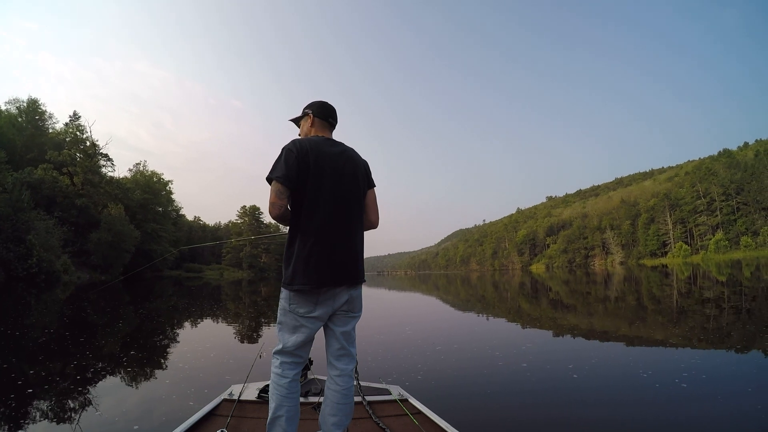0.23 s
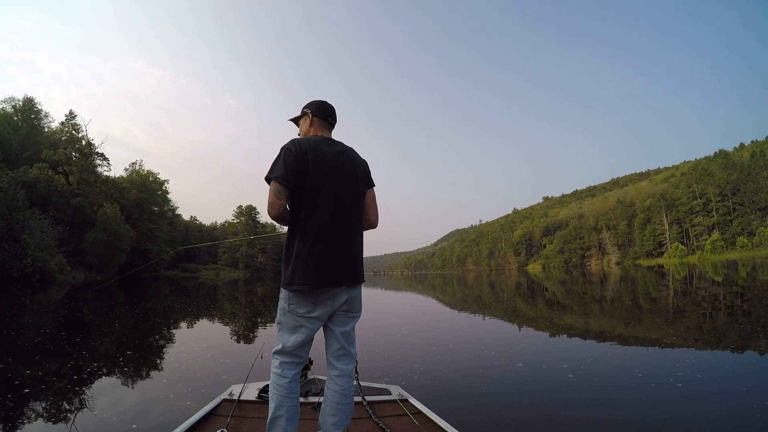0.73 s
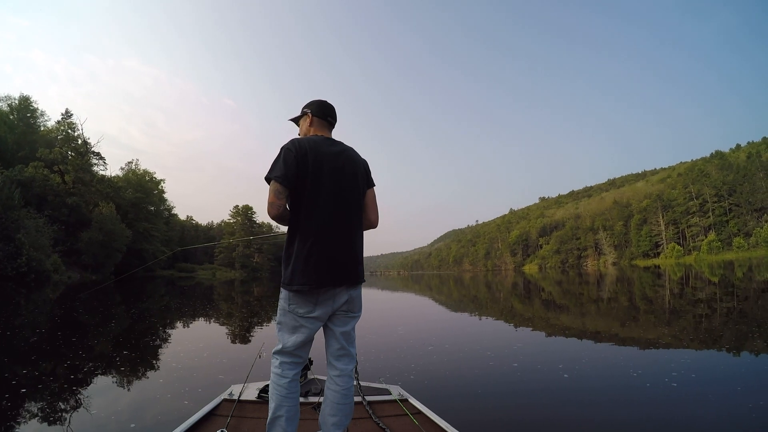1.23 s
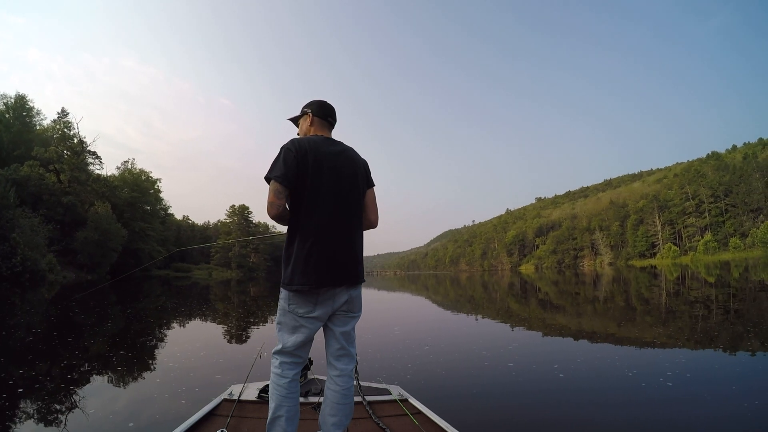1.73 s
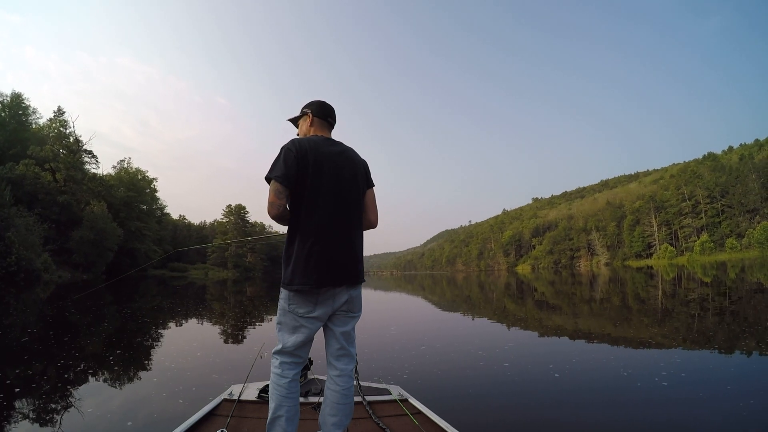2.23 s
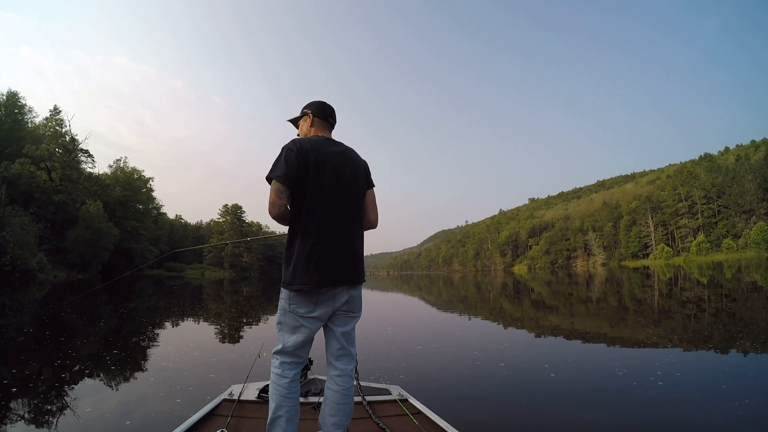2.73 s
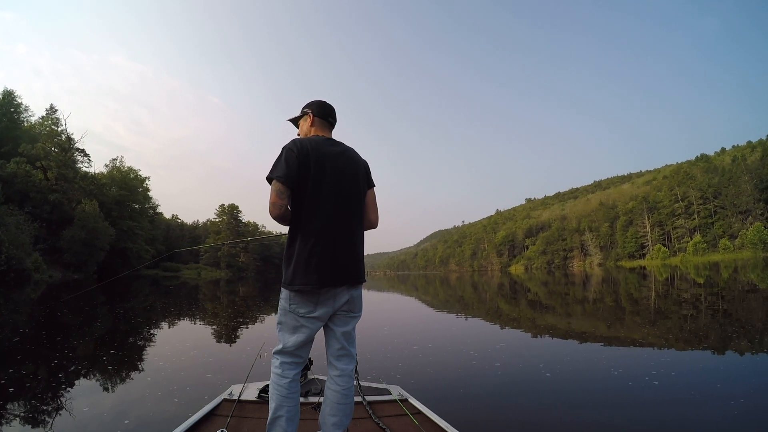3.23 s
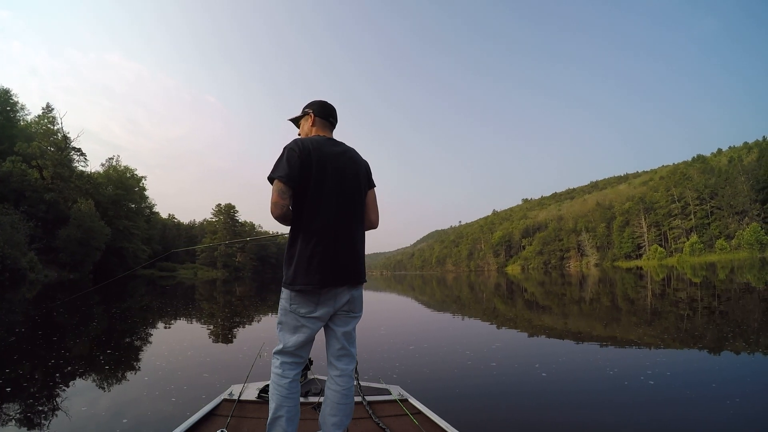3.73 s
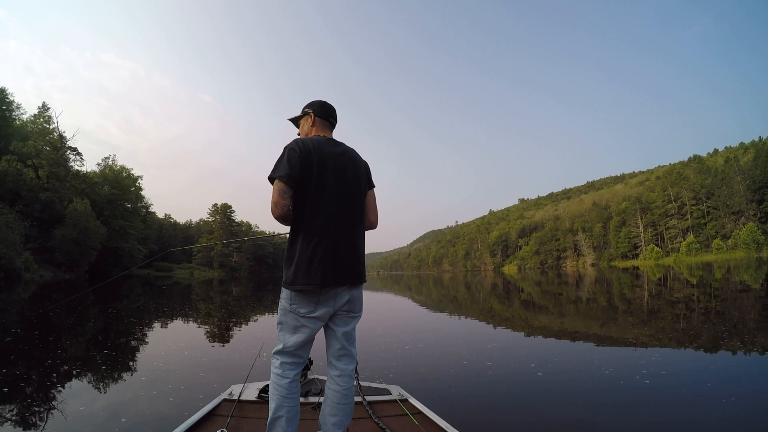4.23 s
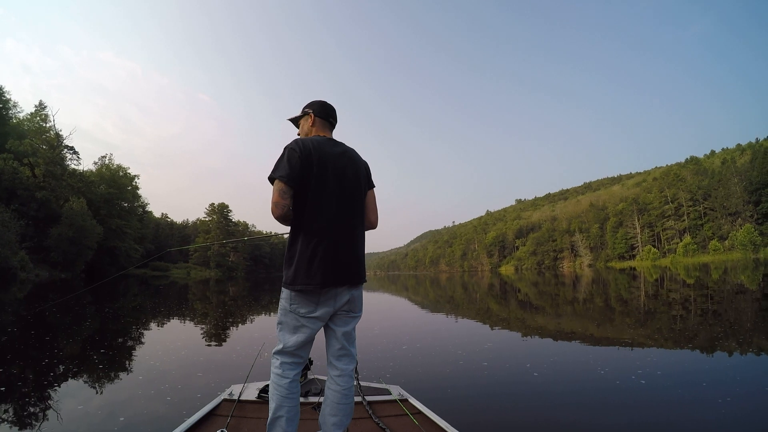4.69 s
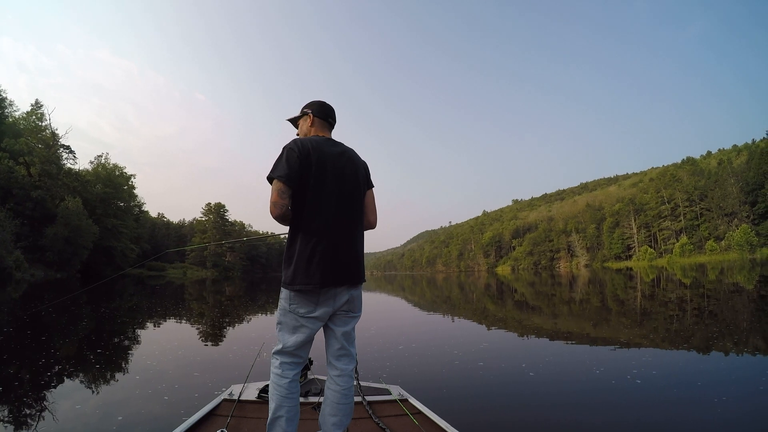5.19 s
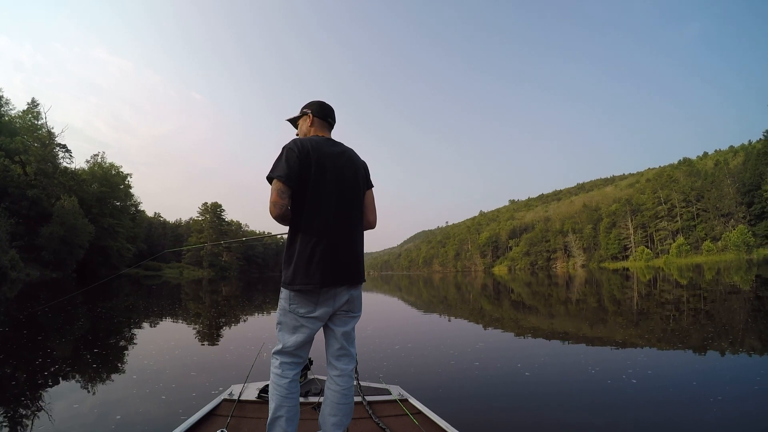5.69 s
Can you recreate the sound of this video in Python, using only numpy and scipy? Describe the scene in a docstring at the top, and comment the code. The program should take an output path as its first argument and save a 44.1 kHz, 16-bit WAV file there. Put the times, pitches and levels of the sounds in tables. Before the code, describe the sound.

From a small boat on a lake, water washes softly and fades as a fishing reel whirs on and off for the first few seconds. Line hisses close on the left, the hull bumps, and one sharp knock stands out midway. Birds whistle and chirp from the banks throughout, one crying out nearby. To the right, a depth sounder keeps up rapid, even ticking beside a faint, fading cricket.

```python
"""Birds chirp from the wooded banks of a lake at dawn, heard from a small boat; one near bird cries out.
Their calls are gliding whistles, some hoarse, that echo off the shore. A depth sounder ticks fast
and evenly, a fishing reel's gears whir in bursts, and its line hisses over the rod rings on the left.
Gear knocks on the rod, the hull bumps, and a faint cricket sings on the right. Underneath, a wash of
water and a broad hiss slowly die down. Left and right are two microphone ports in one housing."""
import sys
import numpy as np
from scipy import signal
from scipy.fft import rfft, irfft, next_fast_len
from scipy.io import wavfile
from scipy.ndimage import uniform_filter1d

SR = 44100
rng = np.random.default_rng(int(sys.argv[2]) if len(sys.argv) > 2 else 0)


def transcribe(signal):
    """Save signal, clipped to [-1, 1], as a 16-bit WAV file at the path in sys.argv[1]."""
    frames = np.atleast_2d(signal).T
    limited = np.clip(frames, -1, 1)
    pcm = np.round(limited * 32767).astype(np.int16)
    wavfile.write(sys.argv[1], SR, pcm)


N = 262395
T = np.arange(N) / SR
SIZE = next_fast_len(N)
HZ = np.maximum(np.arange(SIZE // 2 + 1) * SR / SIZE, 1)

# Clear slurred notes. Each row: start and length in seconds, first, loudest and last pitch in Hz,
# share of the length before the peak, peak level in dB, pan in dB (plus is left), left lag in ms.
CLEAR_NOTES = [ (0.197, 0.019, 3260, 3030, 2750, 0.71, -36.5, -3, -0.035),
               (0.171, 0.056, 4800, 4850, 5100, 0.35, -44.5, -12, -0.059),
               (0.232, 0.058, 2315, 2900, 3650, 0.8, -34, -2.5, -0.029),
               (0.293, 0.044, 3650, 4780, 3950, 0.64, -31, -2.5, -0.035),
               (0.358, 0.03, 3740, 3520, 3310, 0.3, -33.5, -2, 0.00095),
               (0.375, 0.035, 3390, 3120, 2460, 0.51, -34.5, 0, 0.011),
               (0.471, 0.036, 2660, 3300, 3100, 0.41, -37, 1, -0.011),
               (0.755, 0.044, 3470, 3450, 3820, 0.3, -49, -10, -0.028),
               (0.827, 0.039, 3100, 3300, 3060, 0.68, -41.5, -19, -0.03),
               (0.928, 0.075, 4340, 4300, 4150, 0.23, -55, -4, -0.022),
               (1.688, 0.045, 3620, 4470, 3600, 0.51, -30.5, -4.5, -0.023),
               (1.733, 0.052, 2640, 2486, 2420, 0.46, -45, -1, -0.03),
               (1.821, 0.067, 2610, 2780, 2670, 0.73, -39.5, -5.5, -0.023),
               (2.065, 0.014, 6000, 5970, 5950, 0.46, -42, -16, 0.04),
               (3.072, 0.043, 2670, 2710, 3380, 0.57, -48.5, -2, 0.014),
               (3.106, 0.027, 4050, 3870, 3360, 0.61, -41.5, -4, 0.0079),
               (3.129, 0.018, 3480, 3050, 2900, 0.64, -38, -3, 0.021),
               (3.142, 0.029, 2970, 2800, 2500, 0.35, -40.5, -7, 0.021),
               (3.178, 0.024, 2570, 2940, 3420, 0.32, -38.5, 2, -0.04),
               (3.194, 0.03, 3450, 2930, 2260, 0.51, -33.5, 2, -0.071),
               (3.32, 0.024, 5170, 4920, 5030, 0.4, -45, -16, -0.074),
               (3.769, 0.025, 3260, 3110, 3190, 0.59, -48, -10, 0.01),
               (3.898, 0.055, 5200, 5500, 5470, 0.34, -57, -11, 0.019),
               (4.054, 0.14, 6350, 6740, 6900, 0.58, -61, -8, 0.024),
               (4.231, 0.066, 4520, 4690, 4610, 0.13, -44, -14, -0.0085),
               (4.38, 0.066, 2910, 2996, 2860, 0.33, -53, -13, -0.01),
               (4.431, 0.088, 3050, 2820, 2700, 0.51, -62, -15, -0.01),
               (4.653, 0.028, 3450, 4150, 4650, 0.65, -35.5, -5, -0.027),
               (4.696, 0.036, 5300, 5570, 5350, 0.4, -53, -16, -0.091),
               (4.727, 0.026, 4850, 4150, 3400, 0.5, -30, -4.5, -0.027),
               (4.752, 0.04, 3330, 2900, 2200, 0.26, -45.5, -1, -0.039),
               (4.792, 0.017, 2450, 2900, 3320, 0.5, -49, 6, 0.032),
               (4.809, 0.029, 3280, 2970, 3100, 0.6, -37, 5, 0.025),
               (4.831, 0.045, 3350, 4160, 4000, 0.69, -45.5, -5, -0.0078),
               (4.96, 0.073, 3800, 3270, 2650, 0.47, -52.5, -20, -0.02),
               (5.701, 0.01, 3600, 3380, 3280, 0.58, -26, -5, -0.033), ]
# Rough chips. Each row reads like a clear note.
ROUGH_CHIPS = [ (0.311, 0.047, 5490, 5280, 5000, 0.22, -29, -13, -0.036),
               (0.335, 0.095, 4900, 5050, 5000, 0.25, -38, -12, -0.052),
               (1.155, 0.042, 5170, 5230, 5150, 0.2, -38, -16, -0.059),
               (1.645, 0.022, 3870, 4180, 4300, 0.34, -51, 1, -0.01),
               (1.755, 0.057, 3760, 3720, 3750, 0.42, -50.5, -8, -0.037),
               (2.105, 0.056, 8100, 8550, 8200, 0.6, -41, 11, 0.11),
               (2.148, 0.05, 8300, 7700, 7500, 0.47, -35, 9, 0.065),
               (2.215, 0.027, 7700, 7800, 7650, 0.5, -42, 16, 0.052),
               (2.81, 0.027, 3070, 3330, 3180, 0.23, -39, -8, -0.052),
               (3.282, 0.039, 5250, 5180, 5310, 0.13, -37, -16, -0.068),
               (3.85, 0.098, 3070, 3130, 2870, 0.34, -58, -5, -0.026),
               (4.035, 0.062, 5620, 5600, 5530, 0.4, -53.5, -16, -0.048),
               (5.09, 0.035, 2900, 2980, 3050, 0.6, -53, -16, -0.01),
               (5.2, 0.099, 4860, 4700, 4900, 0.32, -53.5, -20, 0.003), ]
# The near bird's loud cry, hoarse wherever it dips.
# Each row: time in seconds, pitch in Hz, level in dB, roughness from 0 to 1.
NEAR_CRY = [(2.092, 6000, -46, 0), (2.098, 5930, -29.5, 0.1), (2.108, 6030, -29, 0.05),
            (2.115, 5800, -40, 0.3), (2.124, 6050, -29, 0.04), (2.157, 6130, -28.5, 0),
            (2.168, 5620, -33, .65), (2.184, 4950, -32, .55), (2.197, 5500, -33, 0.65),
            (2.208, 6120, -28, 0.05), (2.217, 5970, -32, .3), (2.228, 5400, -35.5, 0.75),
            (2.238, 4600, -41, 0.75), (2.248, 4700, -54, 0.8)]


def birds():
    """Each call is a gliding sine; a rasping throat breaks it into noise around its pitch."""
    glide_s, fade_s = .008, .005
    jitter_hz = 25 * drift(500)
    rasp = (drift(650) + 1j * drift(650)) / np.sqrt(2)
    flutter_db = 2.2 * drift(120)
    calls = [slur(*row, rough=.16) for row in CLEAR_NOTES + chatter()]
    calls += [slur(*row, rough=.8) for row in ROUGH_CHIPS]
    calls.append((NEAR_CRY, -9, .047))   # pan in dB, left lag in ms
    out = np.zeros((2, N))
    for points, pan_db, lag_ms in calls:
        s, hz, db, rough = np.transpose(points)
        span = slice(int(s[0] * SR), int(s[-1] * SR))
        t = T[span]
        # The throat rounds every turn of pitch.
        pitch = uniform_filter1d(np.interp(t, s, hz), size=int(glide_s * SR)) + jitter_hz[span]
        cycles = np.cumsum(pitch) / SR - pitch * [[lag_ms / 1000], [0]]
        hoarse = np.interp(t, s, rough)
        throat = np.sqrt(1 - hoarse) + np.sqrt(hoarse) * rasp[span]
        voice = np.imag(throat * np.exp(2j * np.pi * cycles))
        fade = np.clip(np.minimum(t - s[0], s[-1] - t) / fade_s, 0, 1)
        level = fade * from_db(np.interp(t, s, db) + flutter_db[span])
        out[:, span] += level * voice * np.sqrt(2) * rms_one(pan(pan_db))
    return out


def slur(start_s, length_s, first_hz, peak_hz, last_hz, share, db, pan_db, lag_ms, rough):
    """A note swells to its peak and sinks again: three points shaped like the cry's, plus pan and lag."""
    points = [(start_s, first_hz, db - 18, rough),
              (start_s + length_s * share, peak_hz, db, rough),
              (start_s + length_s, last_hz, db - 15, rough)]
    return points, pan_db, lag_ms


def chatter(count=40, low_hz=2440, high_hz=5560, length_s=.1, level_db=-69):
    """Rows of faint bird notes, scattered in time and pitch from the centre to the right."""
    when, pitch, bend, side = rng.random((count, 4)).T
    starts = when * (T[-1] - 2 * length_s)
    pitches = low_hz * (high_hz / low_hz) ** pitch
    bends = .117 * (2 * bend - 1)
    return [(s, length_s, hz * (1 - b), hz, hz * (1 + b), .4, level_db, pan_db, 0)
            for s, hz, b, pan_db in zip(starts, pitches, bends, -20 * side)]


# Two faders. Each row: time in seconds, sounder level in dB, high hiss level in dB.
SOUNDER_AND_HISS_LEVELS = [(0, -35, -81), (.5, -38, -90), (1.5, -41, -76), (2.5, -39.5, -69),
                           (3.6, -40.5, -65), (3.85, -42, -75), (5, -42.5, -100), (5.95, -47.5, -94)]


def sounder(first_s=.0152, period_s=.04170509, tick_s=.0079, tick_hz=8590):
    """Evenly spaced pips of one high tone, each a little different, with a faint bright snap."""
    level_db, _ = automation(SOUNDER_AND_HISS_LEVELS)
    since = (T - first_s) % period_s
    tick = ((T - first_s) // period_s).astype(int) + 1
    burst = np.sin(np.pi * np.clip(since / tick_s, 0, 1)) ** 1.3
    strength = from_db(1.45 * rng.standard_normal((200, 2)))[tick].T
    phase = rng.random(200)[tick]
    tone = np.sin(2 * np.pi * (tick_hz * T + phase))
    blur = .18 * band_noise(resonance(tick_hz, 450))
    snap = .12 * band_noise(resonance(10300, 5000))
    return from_db(level_db) * strength * burst * (tone + blur + snap) * pan(-13)


# Bursts of whirring, plus one short swish around the loudest knock.
# Each row: start and length in seconds, first and last level in dB.
WHIR_BURSTS = [(-.05, 0.32, -30.5, -40), (0.265, 0.58, -38.5, -42.5), (1.056, 0.27, -46, -54.5),
               (1.475, 0.2, -41, -44), (1.68, 0.2, -47, -51), (2.022, 0.18, -44, -53.5),
               (2.083, 0.95, -41, -53.5), (2.959, 0.061, -23, -65), (3.097, 0.5, -50, -55.5)]
# The colour of the gears. Each row: frequency in Hz, relative level in dB.
GEAR_EQ = [(1000, -7.5), (1400, -1.5), (1750, 4.5), (2000, 1), (2400, 3), (2750, -1), (3000, -6.5),
           (3600, -13), (7000, -15.5), (13000, -32)]


def reel():
    """Gears whir in fading, slightly uneven bursts; the same noise makes the one short swish."""
    bursts = sum(swell(*row, attack_s=.048, release_s=.028) for row in WHIR_BURSTS)
    uneven = from_db(.7 * drift(4.15))
    return bursts * uneven * port_noise(GEAR_EQ, flicker_db=3, rate=60) * pan(-.92)


# Pulls of the line. Each row: start and length in seconds, first and last level in dB,
# trim of the upper band in dB.
LINE_PULLS = [(-.05, 0.15, -62, -50, -8), (0.137, 0.5, -61, -57, -11), (0.638, 0.09, -53, -62, -16),
              (0.764, 0.24, -86, -72, -2), (1.052, 0.42, -55.5, -70, -5), (1.493, 0.37, -63.5, -80, -4),
              (2.054, 0.4, -57.5, -74, -4), (2.376, 0.65, -70.5, -75, -3), (3, 0.05, -58, -70, -9),
              (3.043, 0.16, -58, -68, -7), (3.17, 0.13, -54, -64.5, -6), (3.262, 0.034, -63, -61, -9),
              (3.335, .07, -72, -65, -6), (3.406, 0.095, -60.5, -64.5, -6), (3.534, 0.075, -69, -67, -6),
              (4.541, 0.04, -48, -62.5, -4)]
# The rod rings' main and upper hiss. Each row: centre in Hz, width in Hz, relative level in dB.
MAIN_RING_BANDS = [(10610, 1100, 2.5), (10630, 1500, 8), (9900, 2000, -15)]
UPPER_RING_BANDS = [(13000, 700, -9), (13000, 1700, -4), (14500, 2100, -4.5), (11500, 2300, -5)]
# The main hiss rises and sinks with the line's tension. Each row: time in seconds, centre in Hz.
LINE_CENTRE = [(0, 10600), (.12, 10700), (.23, 10950), (.4, 10750), (.46, 10250), (.56, 10650),
               (.61, 10400), (.67, 11000), (.75, 10450), (1.07, 10600), (1.2, 10900), (2.05, 10800),
               (3.05, 10750), (3.19, 10800), (3.29, 10350), (3.37, 10900), (3.44, 10350), (3.5, 10450),
               (3.55, 10800), (3.62, 10350), (4.55, 11000)]


def line_hiss():
    """Line slips over the rod rings in dense small grains, now one ring louder, now another; mono."""
    def rub(bands):
        return rms_one(sum(from_db(db + 1.5 * drift(7.8) + 3 * drift(110))
                           * band_noise(resonance(hz, width_hz) ** 2) for hz, width_hz, db in bands))

    main, upper = rub(MAIN_RING_BANDS), rub(UPPER_RING_BANDS)
    centre_hz, = automation(LINE_CENTRE)
    shift_cycles = np.cumsum(centre_hz - MAIN_RING_BANDS[0][0]) / SR
    main = np.real(signal.hilbert(main) * np.exp(2j * np.pi * shift_cycles))
    grains = from_db(2 * drift(700) + 1.8 * drift(30))
    return grains * sum(swell(*row, attack_s=.02, release_s=.03) * (main + from_db(upper_db) * upper)
                        for *row, upper_db in LINE_PULLS)


# Snags of the line. Each row: time in seconds, strength in dB.
SNAG_HITS = [(3.1834, -33), (3.192, -32), (3.196, -35), (3.28, -36), (4.5463, -32), (4.558, -30),
             (4.576, -35)]
# Their bright ping. Each row: frequency in Hz, relative level in dB, ring time in seconds.
SNAG_RING = [(10700, 3, 0.005), (11500, 3, 0.005), (12900, -6, 0.004)]


def line_snags():
    """The line catches with tiny high ticks; mono."""
    return from_db(-17.5) * ring(impulses(SNAG_HITS), SNAG_RING)


# Hard gear hitting the rod. Each row: time in seconds, strength in dB.
KNOCK_HITS = [(1.9175, -21), (1.934, -31), (2.358, -36), (2.9923, -1.5), (3.0052, -24), (3.308, -34),
              (3.692, -34), (4.087, -41), (4.2807, -44), (4.342, -41), (4.54, -43)]
# The body of a knock. Each row: frequency in Hz, relative level in dB, ring time in seconds.
KNOCK_RING = [(1300, -15.5, 0.02), (1710, -1.5, 0.0054), (2320, -6.5, 0.0061)]


def knocks(bounce_s=.0022, rattle_t60_s=.15):
    """A soft-edged knock, its bounce off the deck and a short rattle."""
    hits = impulses(KNOCK_HITS)
    hits += .35 * np.roll(hits, round(bounce_s * SR))
    rattle_decay = signal.lfilter([1], [1, -from_db(-60 / (rattle_t60_s * SR))], abs(hits))
    rattle = from_db(-40) * rattle_decay * rng.standard_normal(N)
    soften = signal.butter(6, [650, 3150], "band", fs=SR, output="sos")
    body = signal.sosfilt(soften, ring(hits + rattle, KNOCK_RING))
    return np.array([np.roll(body, 5), -body])   # the ports hear it in opposite polarity


# Dull bumps through the hull. Each row: time in seconds, strength in dB, pan in dB.
HULL_HITS = [(0.601, -49, -11), (0.839, -23, -1), (1.144, -31.5, -21), (1.383, -28.5, -13),
             (1.512, -30.5, -15), (1.668, -57, 0), (2.389, -31.5, -10), (2.575, -34, 20),
             (3.156, -38.5, -10), (3.308, -35, 22), (3.69, -34.5, 34)]
# The hull's boom. Each row: frequency in Hz, relative level in dB, ring time in seconds.
HULL_RING = [(180.6, -2, 0.068), (262, 0, 0.018)]


def hull_bumps():
    """Soft blows set the hull ringing low; the microphone passes little below them."""
    hits = np.zeros((2, N))
    for s, db, pan_db in HULL_HITS:
        hits[:, round(s * SR)] = from_db(db) * pan(pan_db)[:, 0]
    low_cut = signal.butter(8, 132, "high", fs=SR, output="sos")
    return -signal.sosfilt(low_cut, ring(hits, HULL_RING))


def cricket(hz=5035):
    """A thin, broken tone far on the right, blurred by leaves and fading away."""
    song = .75 * np.sin(2 * np.pi * hz * T + drift(17)) + band_noise(resonance(hz, 130))
    level = settle(rest_db=-86, excess_db=30.5, time_s=2.5) * from_db(3 * drift(9.1))
    return level * song * pan(-13) * [[-1], [1]]   # opposite polarity at the far port


def shore_echo(x, bank_t60_s=.1, far_t60_s=.45):
    """The near bank scatters a short echo, the far shore a fainter, longer one; each side has its own."""
    t = np.arange(SR // 2) / SR
    decay = from_db(-60 * t / bank_t60_s) + from_db(-27 - 60 * t / far_t60_s)
    tail = rng.standard_normal((2, len(t))) * decay * (t > .004)
    return from_db(-7) * signal.fftconvolve(x, rms_one(tail) / np.sqrt(len(t)), axes=1)[:, :N]


# Faders for the low wash and the rush above it. Each row: time in seconds, level in dB.
WASH_FADER = [(0, -31), (0.93, -35), (1.81, -41.5), (2.1, -46.5), (2.47, -41), (2.97, -45), (3.5, -43.5),
              (4.59, -51.5), (5.95, -51)]
RUSH_FADER = [(0.0, -29.5), (0.28, -32.5), (0.41, -32), (2.02, -41.5), (2.25, -40), (3.13, -47),
              (3.78, -48.5), (4.22, -51.5), (5.73, -56), (5.95, -59)]
# Their colours. Each row: frequency in Hz, relative level in dB.
WASH_EQ = [(25, -58), (55, -62), (100, -68), (137, -9), (168, -5), (250, -5), (330, -9), (450, -15.5),
           (900, -41)]
RUSH_EQ = [(150, -58), (260, -16.5), (350, -4), (570, -0.5), (900, -9), (1300, -29), (2200, -25.5),
           (3500, -48)]


def water():
    """The lake settles in swells and lulls: a low wash under a midrange rush."""
    (wash_db,), (rush_db,) = automation(WASH_FADER), automation(RUSH_FADER)
    wash = from_db(wash_db) * port_noise(WASH_EQ, flicker_db=3.5, rate=50) * pan(-5)
    rush = from_db(rush_db) * port_noise(RUSH_EQ, flicker_db=2.5, rate=79) * pan(-1.94)
    return wash + rush


# The colour of a broad background hiss. # Each row: frequency in Hz, relative level in dB.
BACKGROUND_EQ = [(700, 5.5), (1200, 15), (1800, 5), (3000, 1), (5000, -0.5), (7000, 2), (9000, 0),
                 (11000, -9.5), (12300, -7), (13500, -29), (15000, 10), (15900, -31)]


def background_hiss():
    """A broad, soft hiss that dies down."""
    level = settle(rest_db=-54.5, excess_db=9.7, time_s=1.79)
    return level * port_noise(BACKGROUND_EQ, flicker_db=3, rate=16) * pan(-.13)


def high_hiss():
    """A faint flickering band in the top treble, on the right."""
    _, level_db = automation(SOUNDER_AND_HISS_LEVELS)
    band = band_noise(resonance(12700, 2600) + .5 * resonance(15000, 1100))
    return from_db(level_db + 1.3 * drift(8.1)) * band * pan(-15)


# The stereo image of the two ports. Each row: frequency in Hz, likeness from 0 to 1, left lead in radians.
PORT_IMAGE = [(138, 0.02, 6.6), (248, 0.4, 3.3), (524, 0.8, 3.16), (1010, 0.92, 3.95), (1414, 0.66, 3.27),
              (2500, 0.58, 4.95), (3280, 1, 4.73), (5400, 0.06, 9.3), (7600, 0.01, 3), (13900, 0.3, 2.8)]


def port_noise(eq, flicker_db, rate):
    """Noise as the two ports hear it, in overlapping bands that each flicker on their own; rms 1."""
    gain = from_db(across_hz(eq))
    common, left, right = rfft(rng.standard_normal((3, SIZE)))
    alike, lead = across_hz(PORT_IMAGE), across_hz(PORT_IMAGE, column=2)
    shared = np.sqrt(alike) * common * [np.ones(len(HZ)), np.exp(-1j * lead)]
    spectrum = gain * (shared + np.sqrt(1 - alike) * np.array([left, right]))
    band_position = np.maximum(1.5 * np.log2(HZ / 100), 0)   # bands two thirds of an octave apart
    out, together = 0, .15 * drift(rate / 3)
    for k in range(12):
        band = np.clip(1 - abs(band_position - k), 0, 1)
        flicker = from_db(flicker_db * (together + drift(rate)))
        if np.sum(band * gain ** 2) > 1e-4 * np.sum(gain ** 2):   # skip near-silent bands
            out = out + flicker * irfft(spectrum * band, SIZE)[:, :N]
    return rms_one(out)


def band_noise(gain):
    """Coloured noise of rms 1."""
    return rms_one(irfft(rfft(rng.standard_normal(SIZE)) * gain, SIZE)[:N])


def resonance(hz, width_hz):
    """Gain of a steep peak at every frequency."""
    return 1 / (1 + (2 * (HZ - hz) / width_hz) ** 2)


def impulses(hits):
    """One click for each row of time and strength."""
    clicks = np.zeros(N)
    for s, db in hits:
        clicks[round(s * SR)] = from_db(db)
    return clicks


def ring(clicks, modes):
    """Each click sets the modes ringing: sines that fall 60 dB in their ring time."""
    out = 0
    for hz, db, t60 in modes:
        r, w = from_db(-60 / (t60 * SR)), 2 * np.pi * hz / SR
        out += from_db(db) * signal.lfilter([0, np.sin(w)], [1, -2 * r * np.cos(w), r * r], clicks + 1e-18)
    return out


def swell(start_s, length_s, first_db, last_db, attack_s, release_s):
    """Envelope of one burst: it sets in, slides from one level to the other and runs out."""
    since = T - start_s
    edges = np.clip(since / attack_s, 0, 1) * np.exp(-np.maximum(since - length_s, 0) / release_s)
    return edges * from_db(first_db + (last_db - first_db) * np.clip(since / length_s, 0, 1))


def settle(rest_db, excess_db, time_s):
    """Gain that dies down towards a resting level."""
    return from_db(rest_db + excess_db * np.exp(-T / time_s))


def drift(rate):
    """Random wander of spread 1: `rate` points a second, joined by lines."""
    return np.interp(T * rate, np.arange(5000), rng.standard_normal(5000)) * np.sqrt(1.5)


def automation(rows):
    """One curve through time for each column after the first."""
    s, *columns = np.transpose(rows)
    return [np.interp(T, s, column) for column in columns]


def across_hz(rows, column=1):
    """One column of a table at every frequency, joined on a log axis."""
    columns = np.transpose(rows)
    return np.interp(np.log(HZ), np.log(columns[0]), columns[column])


def pan(db):
    """Left and right gain, the left `db` above the right."""
    return from_db([[db / 2], [-db / 2]])


def from_db(db):
    """Decibels to gain."""
    return 10 ** (np.asarray(db) / 20)


def rms_one(x):
    """Scaled to rms 1."""
    return x / np.sqrt(np.mean(x ** 2) + 1e-20)


def scene():
    """The stereo mix; only the birds and the sounder echo off the shore."""
    bed = water() + background_hiss()
    calls, ticks = birds(), sounder()
    distance = shore_echo(calls + .65 * ticks) + cricket() + high_hiss()
    fishing = reel() + (line_hiss() + line_snags()) * pan(26.3)   # the line runs close to the left port
    return calls + ticks + fishing + knocks() + hull_bumps() + distance + bed


def record(dry):
    """A steep low-pass cuts the top, 70 dB down at 15.8 kHz."""
    return signal.sosfilt(signal.cheby2(12, 70, 15800, fs=SR, output="sos"), dry)


dry = scene()
out = record(dry)
transcribe(out)
```